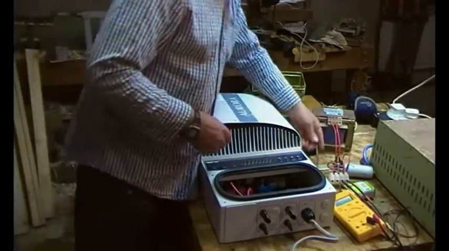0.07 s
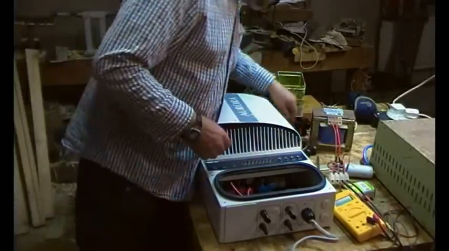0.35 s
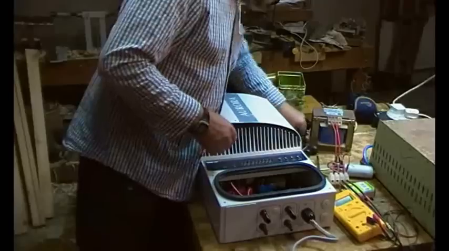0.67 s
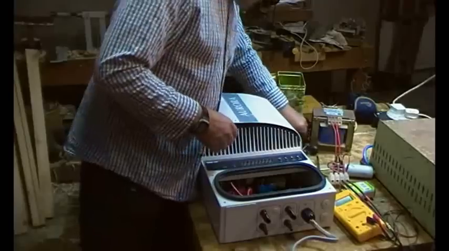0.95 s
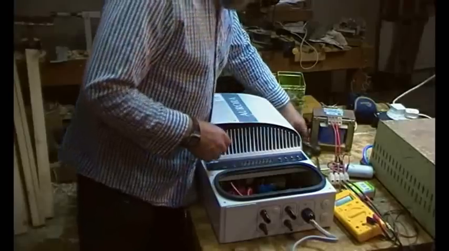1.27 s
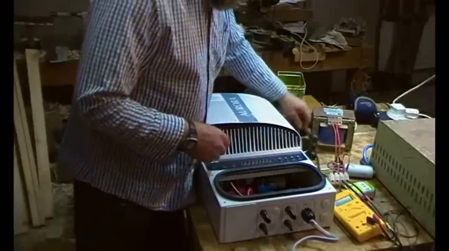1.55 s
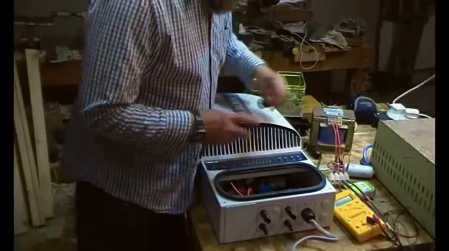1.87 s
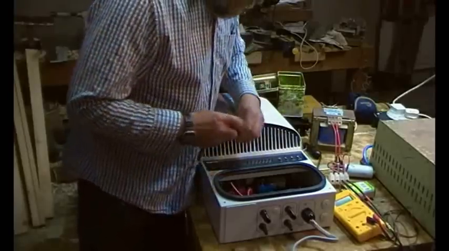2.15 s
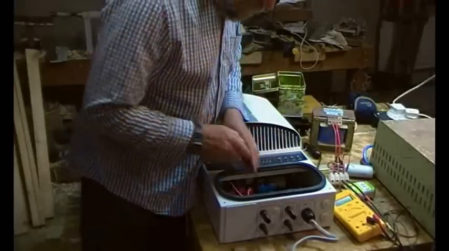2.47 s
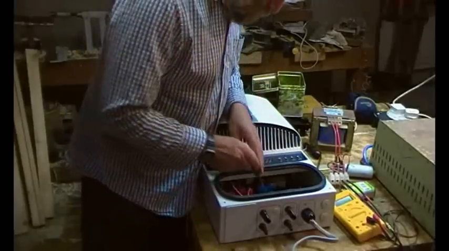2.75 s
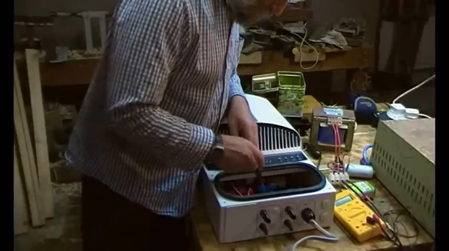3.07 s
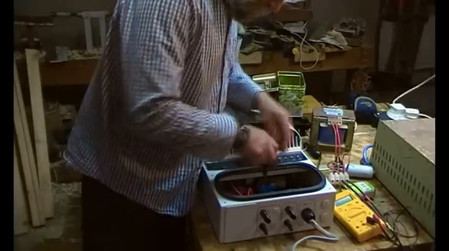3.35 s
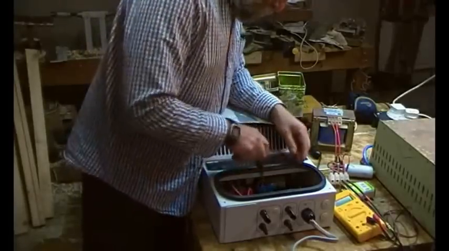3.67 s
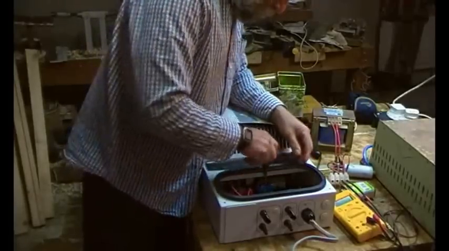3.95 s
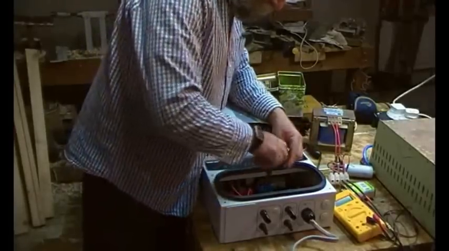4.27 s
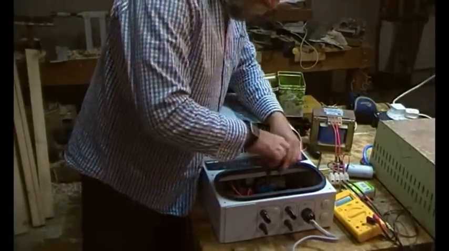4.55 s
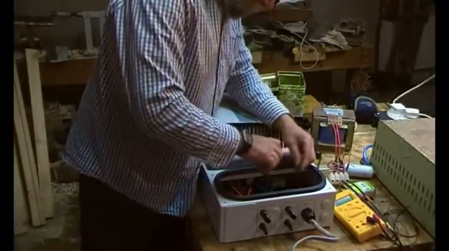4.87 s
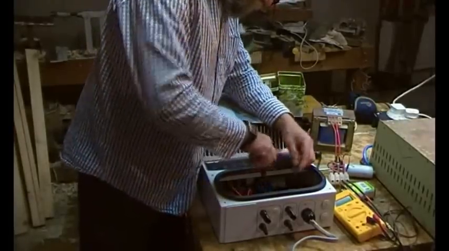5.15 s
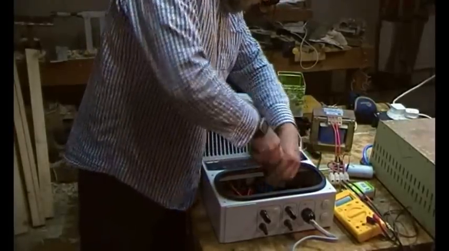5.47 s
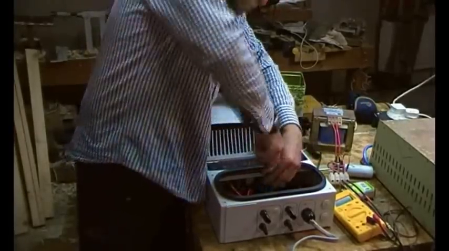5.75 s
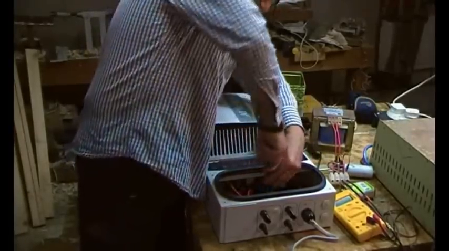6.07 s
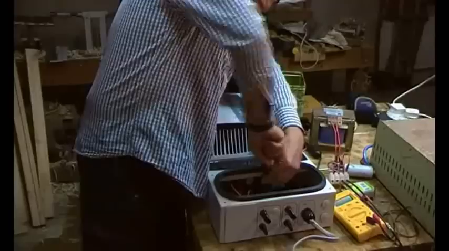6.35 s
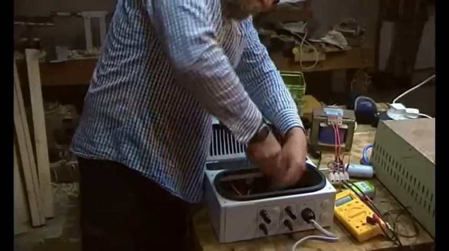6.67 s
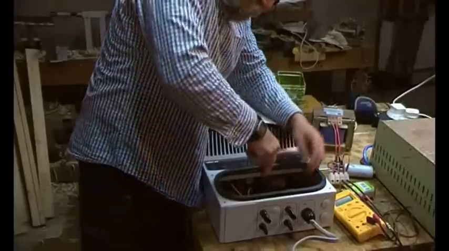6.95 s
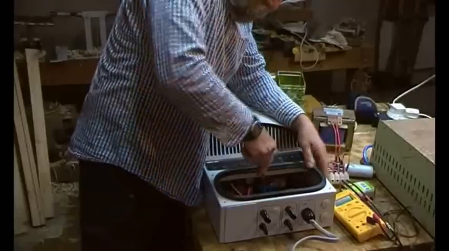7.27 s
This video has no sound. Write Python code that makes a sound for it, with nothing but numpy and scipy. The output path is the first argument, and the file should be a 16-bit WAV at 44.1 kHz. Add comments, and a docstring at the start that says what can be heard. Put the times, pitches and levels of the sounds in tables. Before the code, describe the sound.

At about 0.35 seconds a cover piece knocks loudly on a wooden workbench, and a steel tool immediately falls and bounces with a bright ring until 0.6. From 0.9 to 2 seconds loose parts are set down and briefly dragged, with dull knocks and a slight bench rumble; a loud metallic clatter comes at 1.3 and another sharp knock at 1.8. After a short pause the work is much quieter. From 2.7 seconds a screwdriver clinks and slides on screws, with short scrapes until about 3.9. From 3 seconds onward hands irregularly tap and rub the hollow casing, most clearly around 5.1, 5.7 and 6.4. Faint, brief squeaks occur around 3.3, 3.6, 4.4 and 6.7, and sleeves rustle softly near 4.8 and 5.5. A few bright clinks finish at 7.1 to 7.3. Everything sounds nearby in a small room, over a faint steady hiss.

```python
"""An inverter is taken apart on a wooden bench in a small workshop.
First a piece knocks on the bench and a steel tool falls and bounces; each impact excites damped modes.
Until about 2 s, loose parts are set down and dragged, with dull knocks and a metallic clatter.
From 2.7 s a screwdriver clinks and slides on the screws while the hands tap and rub the hollow casing.
Stick-slip friction adds brief squeals and the rustle of sleeves; a faint hiss lies under it all."""
import sys
import numpy as np
from scipy import signal
from scipy.fft import rfft, irfft, next_fast_len
from scipy.io import wavfile
from scipy.ndimage import uniform_filter1d

SR = 44100
rng = np.random.default_rng(int(sys.argv[2]) if len(sys.argv) > 2 else 0)


def store_pcm(level_fs):
    """Save levels as 16-bit WAV."""
    pcm = np.round(np.clip(level_fs, -1, 1) * 32767).astype(np.int16)
    wavfile.write(sys.argv[1], SR, np.atleast_2d(pcm).T)


N = 322371
TIME = np.arange(N) / SR
AGE = TIME[:SR * 3 // 4]  # seconds since an impact
BIN_HZ = np.maximum(np.arange(N // 2 + 1) * SR / N, 1)
BAND_EDGES_HZ = np.geomspace(420, 14900, 29) - 400
BAND_HZ = (BAND_EDGES_HZ[1:] + BAND_EDGES_HZ[:-1]) / 2

# Levels in all tables are relative.
# the screwdriver's resonances: pitch_hz, level_db, t60_s
SCREWDRIVER_MODES = [(1330, -24, .4), (1793, -22, .26), (1828, -20, .3), (2237, -25, .24), (2436, -18, .35),
                     (2810, -17, .3), (2853, -23, .23), (3058, -16, .25), (3208, -15, .2), (3566, -19, .2),
                     (3798, -21, .22), (3838, -12, .22), (4199, -15, .21), (4382, -21, .2),
                     (4926, -22, .18), (5052, -22, .16), (5343, -19, .16), (5784, -20, .17),
                     (6807, -23, .17), (7216, -20, .2), (7849, -21, .2), (8180, -22, .18),
                     (10236, -23, .17), (11260, -27, .14)]
# the two microphone ports fall out of step near 5 kHz: frequency_hz, correlation
PORT_CORRELATION = [(100, 0.97), (3200, 0.98), (4100, 0.38), (5000, -0.36), (6000, -0.5), (7000, -0.48),
                    (7700, 1), (8700, -0.37), (9800, 0.16), (11500, -0.43)]


def bench_knocks():
    """Impact excitation: pieces land edge by edge and drive the low modes of the wooden bench."""
    # landings: start_s, level_db, bass_db, treble_db, second_edge_lag_s, second_edge_db
    landings = [(0.3511, -9.5, 2, 5, .0053, -3.5), (0.742, -47.5, -4, 0, 0.041, -11.5),
                (0.931, -26.5, 0, 1.5, .013, 3.5), (1.172, -33.5, 6, -14.5, .008, -26),
                (1.277, -39.5, 10, 11.5, 0.0099, 5), (1.337, -16.5, -0.5, 2, 0.00388, -4.5),
                (1.555, -23, -7, -8, .008, -3.5), (1.601, -37.5, 14, 4, 0.0093, -8.5),
                (1.725, -30.5, -8.5, -15, .008, 12.5), (1.8167, -12.5, -8, 3.5, 0.0069, -3.5),
                (1.966, -27, -15, -31, 0.00478, -5)]
    colour = [(60, -39.5), (120, -31.5), (200, -26), (300, -16.5), (420, -10.5), (700, -10.5),
              (1200, -11.5), (2000, -20), (3200, -27), (4500, -40.5), (8000, -47), (14000, -68.5)]  # close modes: frequency_hz, band_db
    modes = [(202, -25, 0.37), (296, -22, 0.34), (336, -17, 0.33), (404, -12, 0.31), (495, -16, 0.3),
             (549, -13, 0.29), (630, -24, 0.28), (705, -19, 0.27), (738, -16, 0.27), (773, -22, 0.27),
             (837, -20, 0.26), (875, -25, 0.26), (947, -24, 0.25), (1009, -16, 0.25), (1160, -22, 0.24),
             (1238, -20, 0.24), (1416, -24, 0.23), (1561, -23, 0.22), (1701, -26, 0.22), (1801, -26, 0.22),
             (1841, -25, 0.21), (2336, -24, 0.2)]  # clear modes: pitch_hz, level_db, t60_s
    blows = [hit for *blow, lag_s, again_db in landings
             for hit in rocking(blow, lag_s, again_db, duller_db=6.5)]
    return struck(blows, colour, modes, close_modes(uneven_db=2.5, cluster_hz=50.5),
                  centre_hz=650, contact_s=0.00038, crack_db=11, crack_t60=0.015, body_t60=0.15,
                  room_db=-6, room_t60=0.36, dense_db=-4, modes_db=3)


def tool_drop():
    """Inelastic rebound: a steel tool bounces, and each short contact excites its high modes."""
    bounces = [(0.408, -15, -3, 8), (0.4152, -16.5, 10, -8), (0.435, -21.5, 3, 8), (0.458, -19.5, 2, 3),
               (0.572, -24.5, -7, -13.5)]  # start_s, level_db, bass_db, treble_db
    colour = [(300, -44), (1000, -19), (1800, -20.5), (2400, -11.5), (3000, -10), (4000, -21.5),
              (5500, -17.5), (7800, -11.5), (10000, -20), (12500, -30.5), (14000, -38.5)]  # close modes: frequency_hz, band_db
    modes = [(2336, -18, .28), (2643, -20, .22), (2764, -15, .2), (2830, -18, .22), (2956, -16, .22),
             (3085, -16, .2), (3155, -18, .2), (4054, -26, .18), (7095, -18, .2), (7150, -19, .2),
             (7222, -12, .22), (7456, -22, .16), (7771, -24, .14), (8296, -20, .16), (8403, -16, .18),
             (9744, -23, .16), (10592, -28, .16), (11402, -17, .16), (12598, -22, .17), (13439, -36, .15)]  # clear modes: pitch_hz, level_db, t60_s
    ring = struck(bounces, colour, modes, close_modes(uneven_db=2.5, cluster_hz=89.3),
                  centre_hz=3224, contact_s=0.00027, crack_db=10.5, crack_t60=0.008, body_t60=0.15,
                  room_db=-6, room_t60=0.32, dense_db=-2.5, modes_db=-1.5)
    return ring * from_db([[1.5], [-1.5]])  # stronger at the left port


def part_clatter():
    """Free vibration: loose metal parts ring at inharmonic frequencies after each collision."""
    collisions = [(0.944, -36.5, 4, -4), (1.014, -35.5, 8, -55), (1.03, -51, 11, -52), (1.167, -43.5, 8, 0),
                  (1.237, -41.5, 1, 4), (1.283, -37, -0.5, 7), (1.304, -9.5, -6.5, -1.5),
                  (1.338, -19.5, -2.5, -7), (1.377, -21.5, -7, 1), (1.599, -38.5, -9.5, 11),
                  (1.728, -35.5, -2, 9.5), (1.801, -40.5, -2.5, 10)]  # start_s, level_db, bass_db, treble_db
    colour = [(300, -35), (1000, -21.5), (1800, -15.5), (2400, -15), (3000, -8), (4000, -19), (5500, -15.5),
              (7500, -18.5), (10000, -25.5), (12500, -39.5), (14000, -42)]  # close modes: frequency_hz, band_db
    modes = [(1561, -17, .32), (1645, -19, .28), (1701, -22, .28), (1801, -19, .28), (1844, -15, .3),
             (2603, -17, .26), (2662, -18, .25), (2713, -21, .22), (2842, -21, .2), (2953, -19, .2),
             (3052, -16, .17), (3112, -17, .2), (3375, -18, .15), (3475, -16, .18), (3620, -20, .12),
             (4301, -24, .18), (4780, -24, .15), (4993, -25, .15), (5679, -27, .17), (7413, -24, .2),
             (7900, -22, .12)]  # clear modes: pitch_hz, level_db, t60_s
    return struck(collisions, colour, modes, close_modes(uneven_db=5.5, cluster_hz=70.1),
                  centre_hz=3300, contact_s=0.0011, crack_db=8.5, crack_t60=0.019, body_t60=0.061,
                  room_db=-3, room_t60=0.29, dense_db=-3.5, modes_db=-1.5)


def casing_taps():
    """Shell resonance: each tap sounds the hollow casing and rocks it on its feet."""
    taps = [(3.094, -39, -2.5, -7), (3.295, -41, -1, 15), (3.32, -38, -11, -17), (3.402, -40.5, -7, -2.5),
            (3.803, -36.5, 1, 10), (4.253, -34.5, -2.5, -3), (4.335, -51.5, 12.5, 3), (4.405, -45, -5, -12),
            (4.49, -43, -13, 3), (5.083, -28, -2, 9), (5.118, -37, -5, -24), (5.186, -50, 2.5, 9),
            (5.309, -42, -9, 2.5), (5.389, -42, -1, 9), (5.423, -35, -17, -6), (5.461, -50, 10, 13),
            (5.665, -31, 4, 12.5), (5.815, -49.5, -14, 2), (5.92, -45, -29, 0.5), (5.995, -60.5, 18, 11.5),
            (6.073, -59, 19.5, 7.5), (6.385, -33, 2.5, -1.5), (6.598, -42, 2, -6), (6.641, -35.5, -12, 3),
            (6.68, -49, -19, 7), (6.872, -45.5, 6, 5.5), (7.114, -45, 0.5, -2)]  # start_s, level_db, bass_db, treble_db
    colour = [(60, -31.5), (120, -24.5), (200, -24), (320, -14), (450, -7.5), (650, -9.5), (1000, -15.5),
              (2000, -14.5), (2800, -15.5), (4500, -29), (8000, -29), (14000, -43)]  # close modes: frequency_hz, band_db
    modes = [(269, -15, .28), (304, -14, .27), (342, -12, .26), (404, -14, .25), (439, -15, .24),
             (549, -17, .23), (611, -16, .23), (756, -24, .2), (848, -19, .21), (996, -26, .18),
             (1273, -26, .15), (1459, -25, .15), (1846, -22, .14), (1978, -21, .12), (2431, -23, .12)]  # clear modes: pitch_hz, level_db, t60_s
    blows = [hit for tap in taps for hit in rocking(tap, lag_s=0.008, again_db=-2.5, duller_db=5)]
    return struck(blows, colour, modes, close_modes(uneven_db=4, cluster_hz=69.84),
                  centre_hz=690, contact_s=0.0015, crack_db=16.5, crack_t60=0.026, body_t60=0.28,
                  room_db=-12, room_t60=0.4, dense_db=-4, modes_db=5.5)


def screwdriver_clinks():
    """Hard contact: the blade strikes the screws and rings in its bright modes."""
    clinks = [(2.737, -40.5, -1.5, 0), (2.753, -33, -4, 1), (3.296, -44.5, 5, 3), (3.802, -44.5, 8, 15.5),
              (4.338, -56.5, 21.5, 19), (4.737, -50.5, 1, -9), (4.968, -50, -1, 4), (5.079, -43, 15, 13.5),
              (5.423, -41, 10, -7.5), (5.664, -38.5, 18.5, 9.5), (6.394, -54, 19, 16),
              (6.64, -40.5, 5.5, -9), (7.131, -30, -7, 6.5), (7.229, -41, 5.5, 0.5), (7.28, -36.5, -7.5, 2)]  # start_s, level_db, bass_db, treble_db
    colour = [(300, -36), (1000, -21.5), (1800, -20), (2400, -11), (3000, -11.5), (4000, -13.5), (5500, -8),
              (8000, -7.5), (10000, -13), (12500, -21.5), (14000, -35)]  # close modes: frequency_hz, band_db
    return struck(clinks, colour, SCREWDRIVER_MODES, close_modes(uneven_db=5.5, cluster_hz=89.2),
                  centre_hz=3570, contact_s=0.00082, crack_db=7, crack_t60=0.018, body_t60=0.081,
                  room_db=-5.5, room_t60=0.31, dense_db=-4, modes_db=2)


def screwdriver_slides(ring_db=35.5, half_width_hz=7.4):
    """Forced vibration: the hiss of the sliding blade sets the screwdriver's modes singing."""
    slides = [(2.695, 0.021, -51.5), (2.895, 0.034, -47.5), (3.25, 0.04, -55), (3.49, 0.13, -48),
              (3.77, 0.054, -41.5)]  # start_s, length_s, level_db
    colour = [(900, -20.5), (1400, -13.5), (2000, -7), (2900, -6), (4200, -14), (5500, -10.5),
              (6800, -10.5), (7800, -9), (9000, -12), (12000, -24), (14000, -43)]  # hiss spectrum: frequency_hz, density_db
    resonance = sum(from_db(db + ring_db) ** 2 / (1 + ((BIN_HZ - hz) / half_width_hz) ** 2)
                    for hz, db, _ in SCREWDRIVER_MODES)
    colour_db = at_hz(colour, BIN_HZ) + 10 * np.log10(1 + resonance)
    pressure = strokes(slides, swell_db_per_s=273, release_db_per_s=157.5)
    return pressure * coloured(friction(grain_db=0.5, grains_per_s=280), colour_db)


def squeals(roughness=0.14):
    """Periodic stick-slip: regular slipping gives a short, unsteady tone that swells and dies."""
    slips = [(3.554, 0.22, 2019, 2020, -55.5), (4.399, 0.037, 547, 525, -42.5),
             (4.439, 0.097, 517, 631, -52), (3.097, 0.06, 421, 395, -52), (3.297, 0.1, 428, 398, -44.5),
             (6.698, 0.12, 700, 620, -54), (6.861, 0.026, 317, 311, -43.5)]  # start_s, length_s, start_hz, end_hz, level_db
    out = np.zeros(N)
    for start_s, length_s, start_hz, end_hz, level_db in slips:
        count, at = int(length_s * SR), int(start_s * SR)
        wobble = roughness * unit_power(uniform_filter1d(rng.standard_normal(count), size=300))
        phase = 2 * np.pi * np.cumsum(np.linspace(start_hz, end_hz, count)) / SR + wobble
        envelope = from_db(level_db) * np.sqrt(2) * signal.windows.tukey(count, 0.7)
        out[at:at + count] += envelope * (1 + wobble) * np.sin(phase)
    return out


def part_drags():
    """Sliding friction: loose parts scrape over the bench in coarse grains."""
    drags = [(0.96, 0.1, -50), (1.25, 0.21, -50), (1.68, 0.14, -51)]  # start_s, length_s, level_db
    colour = [(410, -31), (700, 4.5), (899, -17), (1790, -5), (2990, -4.5), (3700, -15.5), (6170, -20),
              (7640, -22), (12000, -44), (15600, -60.5), (22000, -120)]  # scrape spectrum: frequency_hz, density_db
    pressure = strokes(drags, swell_db_per_s=238.5, release_db_per_s=119)
    return pressure * coloured(friction(grain_db=4.5, grains_per_s=98), at_hz(colour, BIN_HZ))


def low_rumbles():
    """Structure-borne sound: the bench rumbles on after knocks, and the casing as it is handled."""
    rumbles = [(0.52, 0.096, -44), (1.01, .04, -43), (1.16, 0.03, -47), (1.3, 0.072, -35), (1.64, .03, -57),
               (1.8, 0.056, -42), (3.26, 0.078, -49), (4.38, .06, -51), (5.31, .03, -53.5),
               (5.73, 0.035, -50), (5.94, 0.095, -49), (6.42, 0.043, -46), (6.59, 0.093, -45)]  # start_s, length_s, level_db
    colour = [(41, -46), (70, -28), (114, -5.5), (177, -6), (310, -1), (452, -5.5), (633, -1.5),
              (1210, -26.5), (1510, -16.5), (1640, -29.5), (2000, -12), (2600, -51), (4400, -120)]  # rumble spectrum: frequency_hz, density_db
    envelope = strokes(rumbles, swell_db_per_s=215.5, release_db_per_s=72)
    return envelope * coloured(friction(grain_db=2.5, grains_per_s=240), at_hz(colour, BIN_HZ))


def sleeve_rustle():
    """Fine-grained friction: shirt sleeves give broadband noise as the arms move."""
    movements = [(4.78, 0.14, -55), (5.42, 0.28, -57), (5.73, 0.064, -53), (6.61, 0.033, -53.5)]  # start_s, length_s, level_db
    colour = [(500, -3), (1400, -6), (2000, -3), (2900, -1.5), (4200, -5.5), (5500, -8.5), (6800, -5),
              (7800, -2.5), (9000, -7.5), (12000, -18), (14000, -39)]  # cloth spectrum: frequency_hz, density_db
    pressure = strokes(movements, swell_db_per_s=142, release_db_per_s=105)
    return pressure * coloured(friction(grain_db=3, grains_per_s=500), at_hz(colour, BIN_HZ))


def background():
    """Stationary noise: a diffuse hiss and rumble, only weakly correlated between left and right."""
    colour = [(12, -31), (20, 2.5), (129, -12), (310, -10.5), (481, -12.5), (522, -9.5), (706, -14),
              (879, -13), (1060, -13.5), (2170, -15.5), (2360, -12.5), (3650, -19), (8090, -19.5),
              (11900, -26), (14000, -39)]  # noise spectrum: frequency_hz, density_db
    return coloured(rng.standard_normal((2, N)), at_hz(colour, BIN_HZ), focus=0.34)


def struck(blows, colour, modes, bank, centre_hz, contact_s, crack_db, crack_t60, body_t60,
           room_db, room_t60, dense_db, modes_db):
    """Modal superposition: a blow gives a crack, dying close modes, clear modes and the room's tail."""
    out = np.zeros((2, N + len(AGE)))
    band_hz = BAND_HZ[:, None]
    onset = int(0.022 * SR)
    fade = lambda t60_s: from_db(-60 * AGE / t60_s)
    # the force builds up while the contact lasts, and lows take a cycle more
    rise = lambda hz: 1 - np.exp(-AGE / (contact_s + 1.3 / hz))
    crack = from_db(crack_db) * (band_hz / 3000) ** 0.37 * fade(crack_t60)
    # highs die sooner, both in the body and in the room
    body = fade(body_t60 * (band_hz / 1000) ** -0.25)
    room = from_db(room_db) * fade(room_t60 * (band_hz / 1000) ** -0.17) * (1 - np.exp(-AGE / 0.0047))
    envelope = np.sqrt(crack ** 2 + body ** 2 + room ** 2) * rise(band_hz)
    envelope /= np.sqrt(np.mean(envelope[:, :onset] ** 2, axis=1, keepdims=True))
    envelope_power = np.mean(envelope[:, :2 * onset] ** 2, axis=1)
    mode_hz, mode_db, mode_t60 = np.transpose(modes)
    rings = fade(mode_t60[:, None]) * np.exp(2j * np.pi * mode_hz[:, None] * AGE) * rise(mode_hz[:, None])
    port_phase = np.arccos(np.clip(at_hz(PORT_CORRELATION, mode_hz), -1, 1)) / 2 * np.array([[1], [-1]])
    for start_s, level_db, bass_db, treble_db in blows:
        # force spectrum: hard contacts have more treble
        force = [(centre_hz / 3, level_db + bass_db), (centre_hz, level_db),
                 (centre_hz * 3, level_db + treble_db)]
        offset = rng.integers(bank.shape[2] - len(AGE))
        dense = bank[:, :, offset:offset + len(AGE)] * envelope[:, None]
        # the force sets the energy that each band takes up
        noise_rms = np.sqrt(np.mean(dense[:, :, :2 * onset] ** 2, axis=(1, 2)) / envelope_power)
        gains = from_db(dense_db + at_hz(colour, BAND_HZ) + at_hz(force, BAND_HZ)) / noise_rms
        # every contact point feeds the modes differently
        strength = from_db(modes_db + mode_db + at_hz(force, mode_hz) + rng.normal(0, 3, len(modes)))
        phase = 2 * np.pi * rng.random(len(modes)) + port_phase
        clear = ((strength * np.exp(1j * phase)) @ rings).real
        at = int(start_s * SR)
        out[:, at:at + len(AGE)] += np.tensordot(gains, dense, 1) + clear
    return out[:, :N]


def rocking(blow, lag_s, again_db, duller_db):
    """Double impact: one edge meets the bench, then the other with a duller blow."""
    start_s, level_db, bass_db, treble_db = blow
    return [blow, (start_s + lag_s, level_db + again_db, bass_db, treble_db - duller_db)]


def close_modes(uneven_db, cluster_hz, size=65536):
    """Modal overlap: randomly clustered modes merge into unit-power noise, bands x 2 x size."""
    hz = np.maximum(np.arange(size // 2 + 1) * SR / size, 1)
    clusters = np.interp(hz / cluster_hz, np.arange(len(hz)), rng.standard_normal(len(hz)))
    white = two_ports(*rfft(rng.standard_normal((2, size))), at_hz(PORT_CORRELATION, hz))
    spectra = white * from_db(uneven_db * clusters)
    return np.array([unit_power(irfft(spectra * ((hz >= low) & (hz < high))))
                     for low, high in zip(BAND_EDGES_HZ, BAND_EDGES_HZ[1:])])


def friction(grain_db, grains_per_s):
    """Irregular stick-slip: two noises whose strength varies from grain to grain."""
    grains = from_db(grain_db * rng.standard_normal(N // 10))
    return rng.standard_normal((2, N)) * np.interp(TIME * grains_per_s, np.arange(len(grains)), grains)


def strokes(rows, swell_db_per_s, release_db_per_s):
    """Exponential growth and decay: each stroke swells up to its start, holds and dies away."""
    return np.max([from_db(level_db - swell_db_per_s * np.maximum(start_s - TIME, 0)
                           - release_db_per_s * np.maximum(TIME - start_s - length_s, 0))
                   for start_s, length_s, level_db in rows], axis=0)


def coloured(drive, colour_db, focus=0.98):
    """Source and filter: two unrelated drives become unit-power stereo; low focus means diffuse."""
    size = next_fast_len(N)
    hz = np.maximum(np.arange(size // 2 + 1) * SR / size, 1)
    spectra = rfft(drive, size) * from_db(np.interp(hz, BIN_HZ, colour_db))
    stereo = two_ports(*spectra, focus * at_hz(PORT_CORRELATION, hz))
    return unit_power(irfft(stereo, size)[:, :N])


def two_ports(mid, side, correlation):
    """Partial coherence: sum and difference give left and right a chosen correlation."""
    correlation = np.clip(correlation, -0.99, 0.99)
    mid = np.sqrt((1 + correlation) / 2) * mid
    side = np.sqrt((1 - correlation) / 2) * side
    return np.array([mid + side, mid - side])


def at_hz(points, hz):
    """Interpolation on a log-frequency axis."""
    point_hz, value = np.transpose(points)
    return np.interp(np.log(hz), np.log(point_hz), value)


def from_db(db):
    """Decibels to amplitude ratio."""
    return 10 ** (np.asarray(db) / 20)


def unit_power(x):
    """Normalisation to a mean square of one."""
    return x / np.sqrt(np.mean(x ** 2) + 1e-20)


def scene():
    """Superposition: impacts and friction at the bench add to the steady background."""
    hiss = from_db(-59) * background()
    impacts = bench_knocks() + tool_drop() + part_clatter() + casing_taps() + screwdriver_clinks()
    # things this small radiate little deep bass
    work = signal.sosfilt(signal.butter(2, 105, "high", fs=SR, output="sos"), impacts)
    work += from_db(-2.4) * screwdriver_slides() + squeals()
    work += from_db(2.5) * part_drags() + from_db(-5) * low_rumbles() + from_db(1) * sleeve_rustle()
    return work * from_db([[-0.3], [0.3]]) + hiss


def record(dry, ceiling=0.9, cutoff_hz=14200):
    """Soft saturation rounds the loudest peaks; a steep low-pass then limits the bandwidth."""
    rounded = dry / (1 + (dry / ceiling) ** 6) ** (1 / 6)
    return signal.sosfilt(signal.ellip(10, 0.2, 80, cutoff_hz, fs=SR, output="sos"), rounded)


dry = scene()
out = record(dry)
store_pcm(out)
```